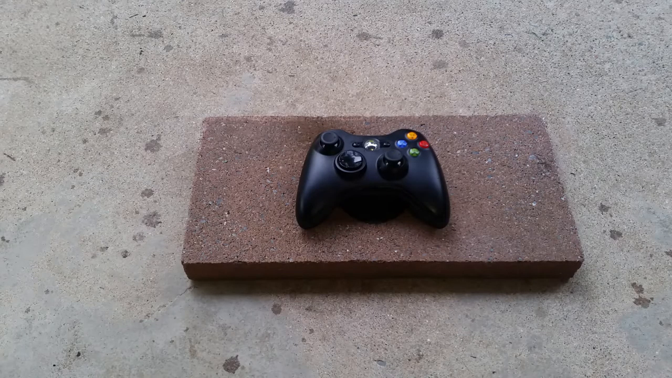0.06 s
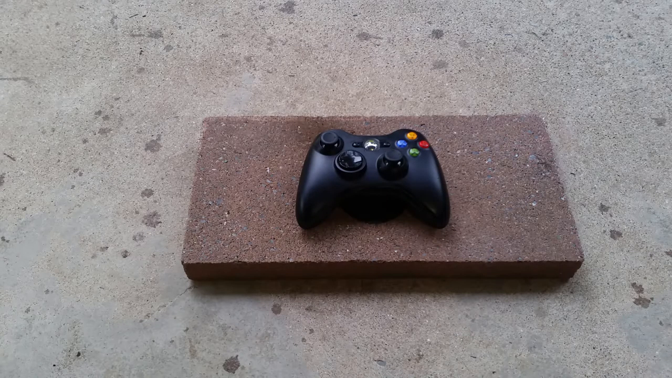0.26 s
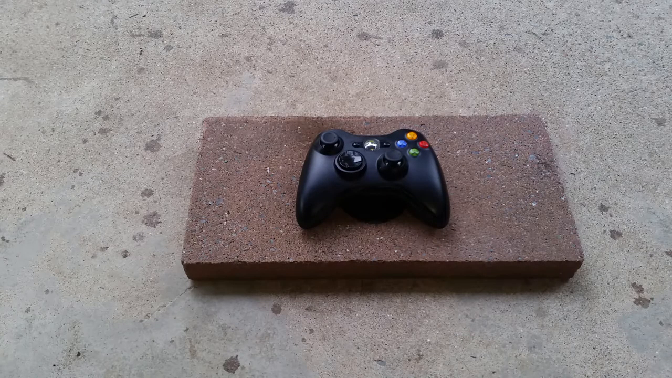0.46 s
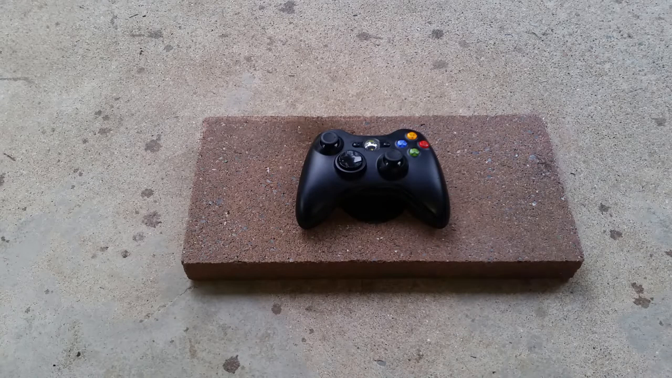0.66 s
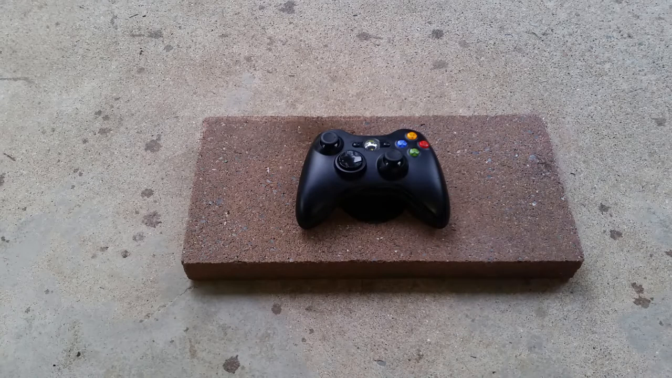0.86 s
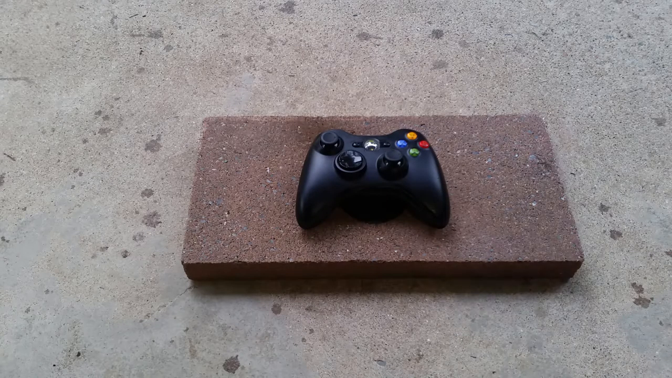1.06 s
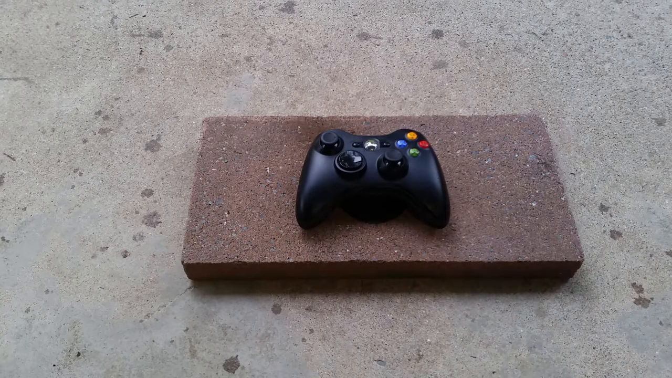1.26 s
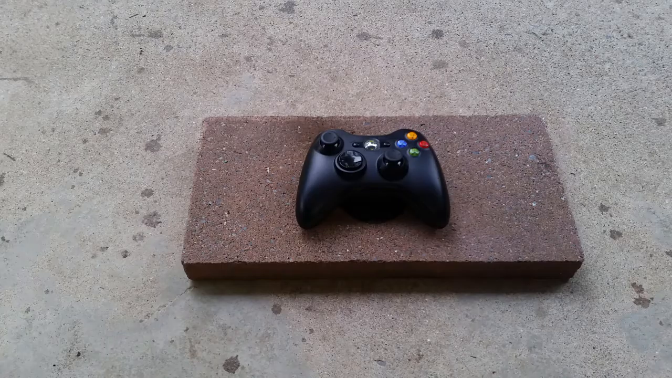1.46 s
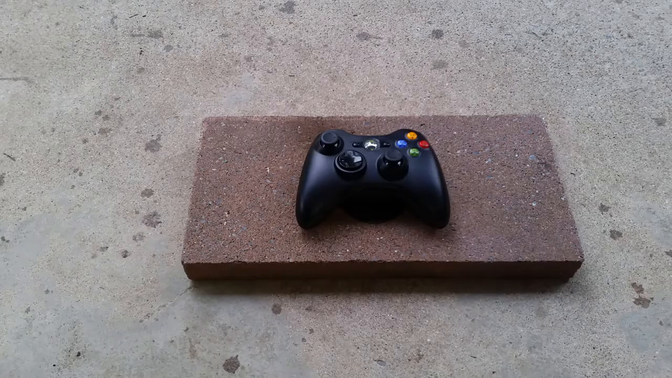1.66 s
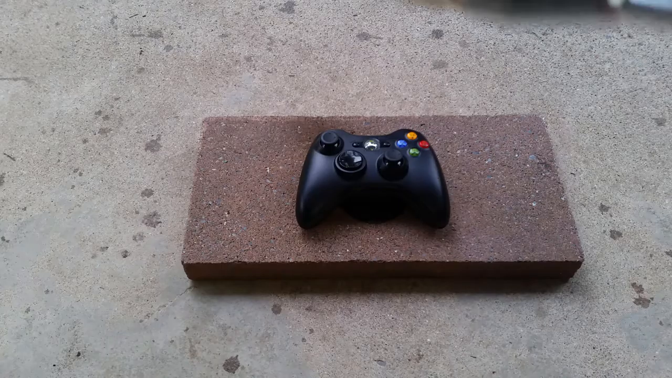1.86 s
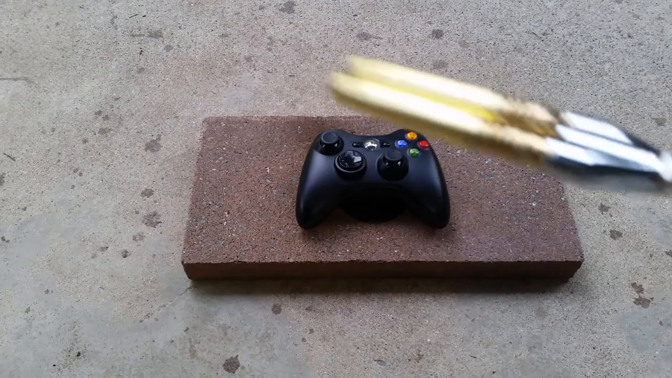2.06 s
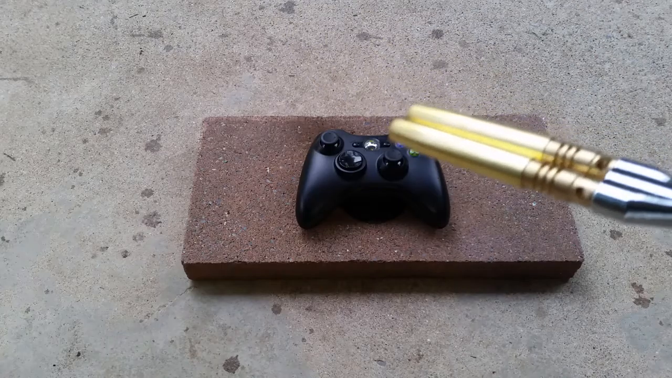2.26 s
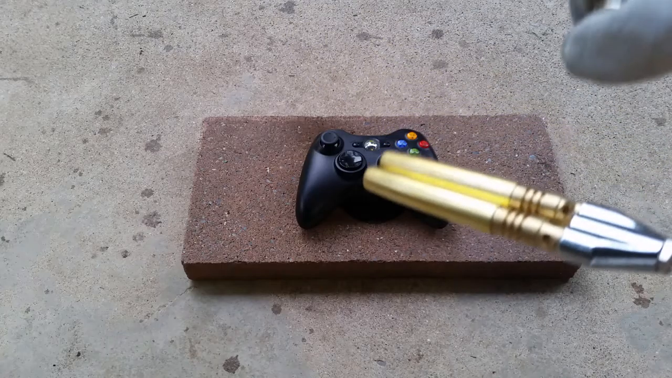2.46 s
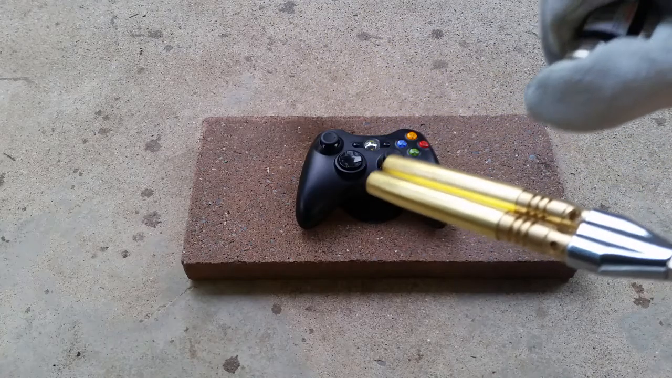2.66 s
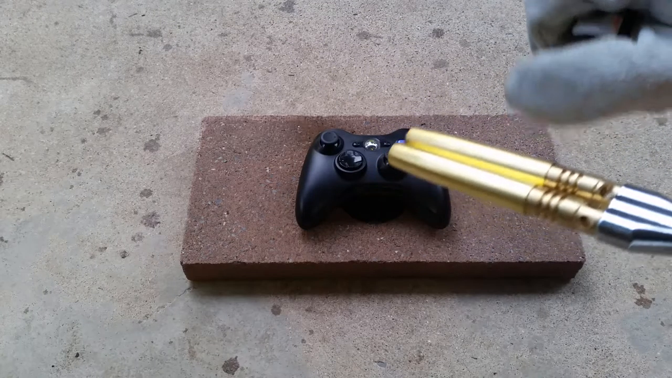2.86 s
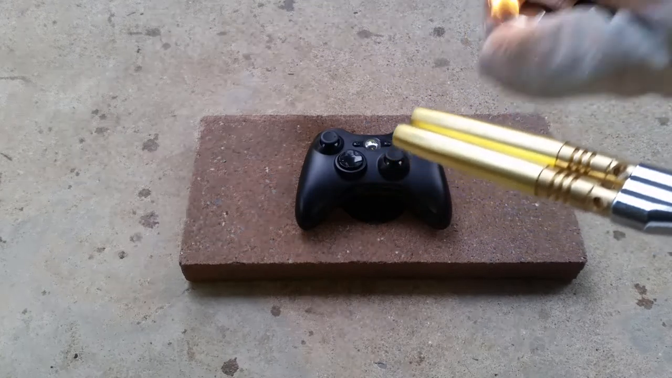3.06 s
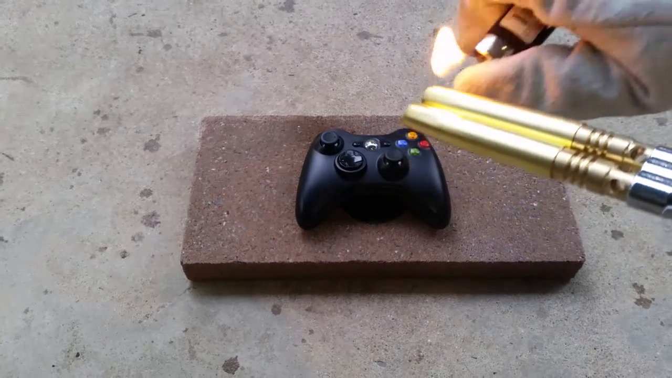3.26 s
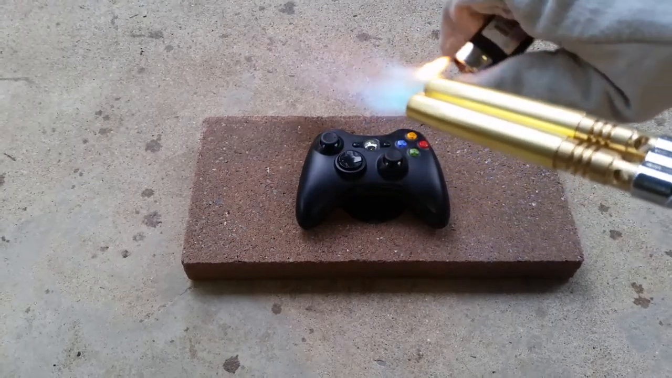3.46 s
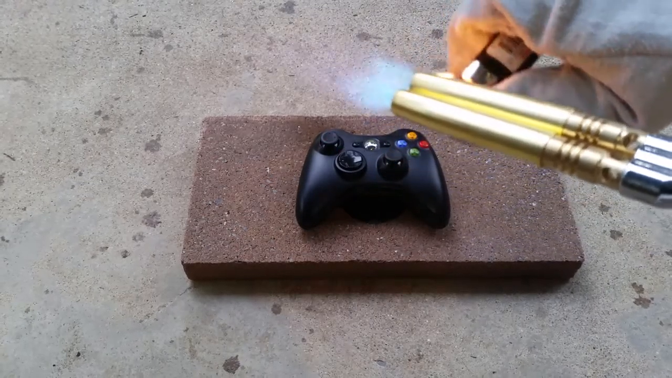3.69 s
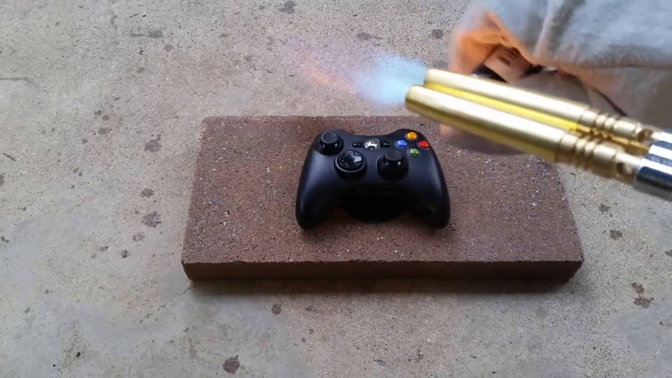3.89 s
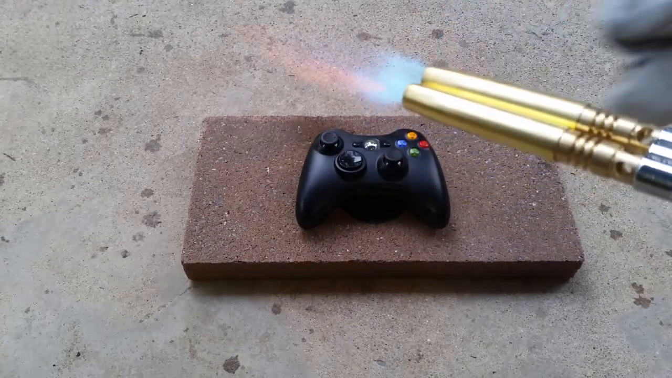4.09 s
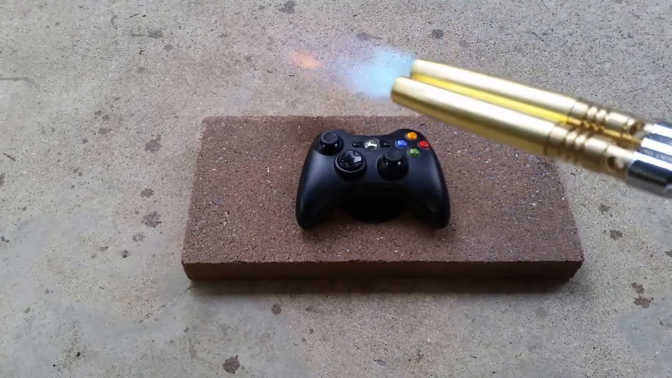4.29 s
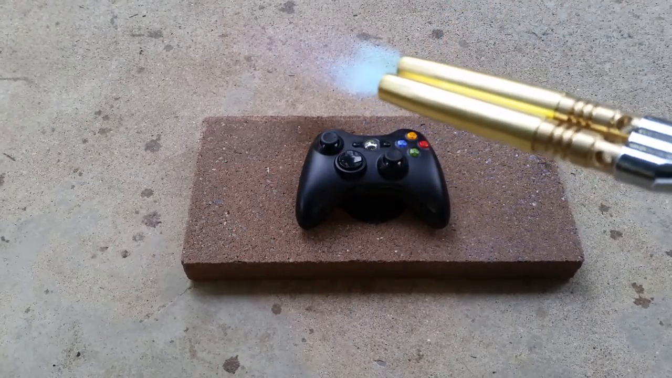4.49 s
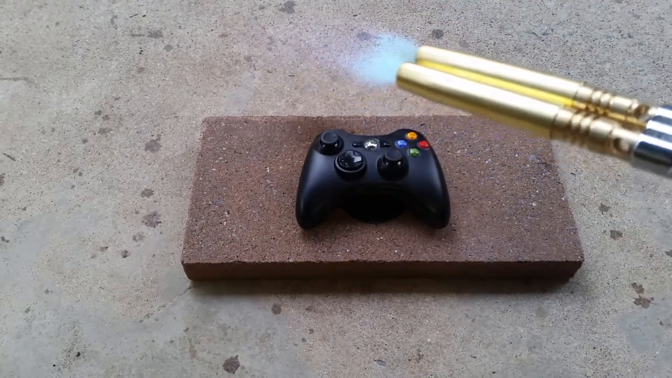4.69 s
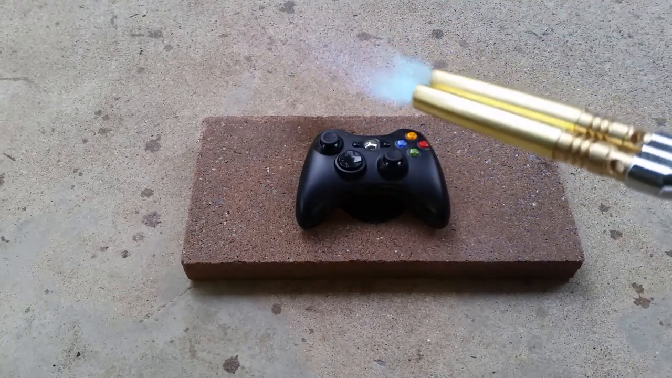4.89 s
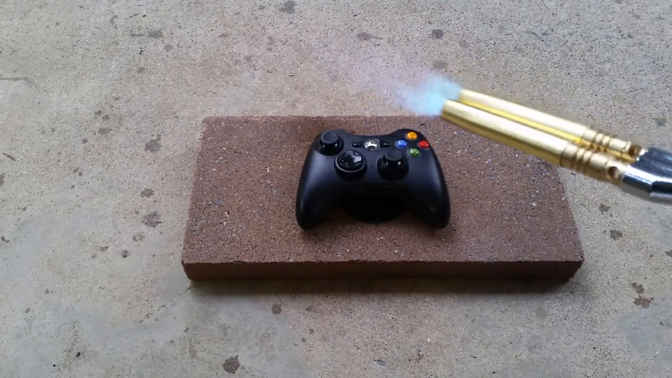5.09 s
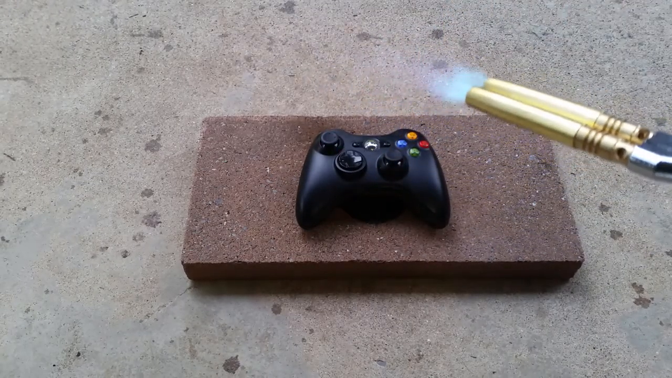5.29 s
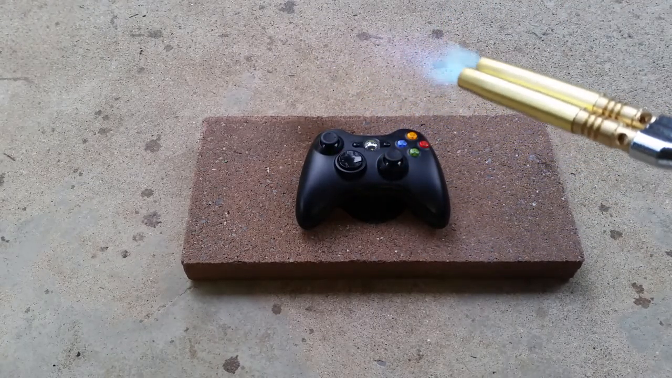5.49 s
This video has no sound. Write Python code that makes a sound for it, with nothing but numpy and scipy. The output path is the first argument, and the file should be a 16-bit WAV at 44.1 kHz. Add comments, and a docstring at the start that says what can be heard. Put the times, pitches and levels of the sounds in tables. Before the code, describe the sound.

Thin airy gas hiss outdoors, two quick flint scratches, a muffled whump, then a much louder continuous blowtorch flame roar.

```python
"""On a concrete patio with a faint outdoor rumble, a twin-barrel gas torch hisses and whistles unlit.
It swings in close to the listener. A lighter scrapes, and the gas catches with a soft thump and then roars.
Each source is random noise given its own colour, loudness and balance between the ears.
Delayed copies act as echoes: the slab mirrors the roar, and its hollow colour bends upward late on."""
import sys
import numpy as np
from scipy import signal
from scipy.fft import rfft, irfft
from scipy.io import wavfile
from scipy.ndimage import uniform_filter1d, map_coordinates

SR = 44100
rng = np.random.default_rng(int(sys.argv[2]) if len(sys.argv) > 2 else 0)


def generate_wav(sig):
    """Save sig (samples, or channels by samples) to the path in sys.argv[1] as 16-bit PCM at SR."""
    pcm = np.round(np.clip(np.atleast_2d(sig).T, -1, 1) * 32767).astype(np.int16)
    wavfile.write(sys.argv[1], SR, pcm)


N = 244314

IGNITE_S, CATCH_S = 3.373, .013  # the gas catches, and the flame is full this much later

# In every table, balance_db is left minus right, and same is how alike the ears are (1 = identical).
# Colour levels are relative: each noise is scaled to its own loudness afterwards.

# Outdoor rumble colour: pitch_hz, level_db (per Hz); then its loudness in dB
OUTDOORS_COLOUR, OUTDOORS_DB = [(20, -28), (50, -23), (100, 6), (160, -1), (260, -6.5), (420, -9),
                                (700, -9.5), (2000, -19.5), (8000, -41)], -65.5
# Likeness of the ears for everything but roar and thump: pitch_hz, same
AIR_SAME = [(60, 1), (300, 0.6), (1400, 0.85), (3000, 0.2), (6000, 0.048), (14000, .05)]
# Lighter wheel scraping the flint: start_s, level_db, rise_s, decay_s
STRIKES = [(2.984, -58.5, .008, .02), (3.010, -48.7, .007, .014)]
# Colour of the scrapes: pitch_hz, level_db (per Hz)
STRIKE_COLOUR = [(20, -10), (60, 0), (200, 8), (600, 3), (1200, 7), (1800, 2), (4500, 2), (7000, -8),
                 (14000, -13)]
# Gathered gas catching, one event: start_s, level_db, rise_s, decay_s
THUMP = (IGNITE_S, -42, .007, .038)
# Colour of the thump: pitch_hz, level_db (per Hz)
THUMP_COLOUR = [(20, -32), (45, -18), (90, 2.5), (160, 4), (400, -3), (1500, -48)]
# Hollow whistle of the unlit barrels: time_s, pitch_hz, level_db (before a lift), balance_db
WHISTLE = [(0, 1317, -56, -7), (.3, 1310, -56, -3), (.46, 1315, -52.5, 0), (1.2, 1324, -56.5, -0.5),
           (1.88, 1354, -59, 2), (2.08, 1250, -60.5, 0), (2.4, 1274, -57.5, -2), (2.7, 1284, -57, -1),
           (3.1, 1243, -56, -3.5), (3.35, 1243, -58.5, -4)]
# Colour of the whistle: multiple of its pitch, level_db
WHISTLE_COLOUR = [(.4, -45), (.7, -36), (.8, -18.5), (.91, -11), (.96, -3), (1, 4), (1.04, -3.5),
                  (1.11, -15), (1.35, -20), (2, -42)]
# Hiss as the hand-held nozzle turns: time_s, level_db (before a lift), balance_db (before scaling)
JET = [(0, -52, -9), (.6, -52.5, -10), (1.3, -53, -6), (1.95, -53.5, -5.5), (2.65, -55.5, -8),
       (3.35, -54.5, -9), (4.2, -55.6, -4.5), (5.54, -56, -9)]
# Colour of the hiss: pitch_hz, level_db (per Hz)
HISS_COLOUR = [(300, -6), (700, -1.5), (1000, 9), (1700, 4.5), (2500, -2), (3000, -3), (4300, -1.5),
               (5800, 1), (7400, 0), (8500, -1), (10600, 1), (12500, 5.5), (14400, 0.5)]
# Upper barrel resonances: unlit_hz, lit_hz, width_hz (before narrowing), unlit_db, lit_db
BARREL = [(3260, 3700, 270, 2, -3), (5160, 5330, 240, 8.5, 7.5), (6530, 6930, 293, 13, 11),
          (8160, 8080, 260, 5, -17), (9900, 9400, 300, 2, 2), (11700, 11600, 360, 12, 8.5),
          (13170, 13500, 570, 8, 4)]
# Swelling and sinking of the hiss around the top resonance: time_s, change_db
SIZZLE = [(0, 4), (.2, -2), (.36, -4), (.48, 1.5), (.75, 1.5), (1.05, 1), (1.25, 1), (1.45, 1), (1.85, 5),
          (2.08, -3), (2.3, 1.5), (2.6, -4.5), (2.95, 2), (3.1, 2), (3.3, 3), (3.42, 2)]
# Colour of the roar: pitch_hz, level_db (per Hz)
ROAR_COLOUR = [(25, -49), (55, -61), (110, -9.5), (180, -5), (270, 1), (380, -8), (490, -0.8), (620, -1.1),
               (780, -4.5), (1020, -5), (1450, -7.5), (2100, -15), (3300, -23), (4150, -25.5),
               (4450, -27.5), (9000, -37.5)]
# Likeness of the ears in the roar and thump: pitch_hz, same
ROAR_SAME = [(60, 1), (600, 0.97), (1400, 0.98), (3000, 0.69), (7000, 0.32)]
# Narrow peaks and dips in the roar: pitch_hz, width_hz, change_db
PEAKS_AND_DIPS = [(2400, 68, -2), (2990, 84, -1.5), (3550, 130, 1), (3780, 67, 4)]
# Brighter rush just after ignition: pitch_hz, change_db; then its decay in seconds
RUSH, RUSH_S = [(1400, 0), (2100, 3), (4100, 2.5), (4600, -1.5)], .3
# Hollow band that bends upward as the torch is drawn back: time_s, pitch_hz, height_db
HOLLOW = [(3.4, 1260, .5), (4.95, 1270, .8), (5.13, 1375, 3), (5.3, 1475, 4.2), (5.54, 1510, 4.2)]
# Echoes from nearby surfaces: left_lag_ms, right_lag_ms, gain, shift_ms per ms of change in the slab's lag
ECHOES = [(.47, 0.29, 0.18, 0.043), (1.21, 1.036, 0.18, 0.15), (1.3, 0.9, 0.14, 0.85),
          (2.25, 2.37, 0.089, 0.86), (2.34, 1.84, 0.13, 1.37), (2.458, 2.13, .21, 0.66),
          (3.69, 3.58, 0.083, 0), (5.12, 5, 0.04, 0), (4.42, 6.6, 0.044, 0.11)]
# Echo off the slab, which follows the torch's position: time_s, lag_ms
SLAB = [(0, 2.4), (1.75, 2.2), (2.05, 1.85), (2.6, 1.48), (3.4, 1.59), (3.65, 1.66), (4.45, 1.71),
        (4.85, 1.68), (5.08, 1.52), (5.22, 1.32), (5.54, 1.31)]
# Torch swinging in from the right: time_s, left_ear_lag_ms
BEARING = [(0, 0.21), (.75, 0.12), (1.3, -0.014), (2.7, 0.0025), (3.7, -0.05)]

TIME = np.arange(N) / SR
FRAME_S = np.arange(N // 256 + 5)[:, None] * 256 / SR  # times of the short slices that carry a colour
BIN_HZ = np.fft.rfftfreq(1024, 1 / SR)

EDGE_HZ = 14600
STEADY = .15  # power by which the whistle's own flutter is divided out
SIZZLE_HZ, SIZZLE_WIDTH_HZ = 11500, 600
LIT_HISS_DB = -4  # once lit, the hiss drops
# Unlit resonances near one pitch grow as the hiss leans right: dB per dB of balance
BEAM, BEAM_CENTRE_DB, BEAM_HZ, BEAM_WIDTH_HZ = 1.8, -8, 4930, 1300
FLAME_DB, FLARE_DB, FLARE_S = -40.5, 1, 0.64  # the roar starts a little louder and settles
HOLLOW_WIDTH_HZ, HOLLOW_BELOW_HZ, HOLLOW_ABOVE_HZ = 105, 210, 390  # width, distance to each valley
SLAB_GAIN, SLAB_REST_MS, SLAB_FALLOFF = 0.31, 1.644, 0.54  # echo at its usual lag; shorter is louder
# The roar brightens as the slab's echo comes sooner: dB per octave per ms of lag
BRIGHTEN, BRIGHTEN_BAND_HZ = 4.5, (580, 1900)


def amp(db):
    """Turns decibels into gain."""
    return 10 ** (np.asarray(db) / 20)


def unit(x):
    """Scales to an average strength (rms) of 1."""
    return x / np.sqrt(np.mean(x ** 2) + 1e-20)


def read(points, hz=BIN_HZ):
    """Joins colour points with straight lines on a log-frequency axis."""
    point_hz, value = np.transpose(points)
    return np.interp(np.log(np.maximum(hz, 1e-3)), np.log(point_hz), value)


def follow(rows, t):
    """Reads every column after the first of a time table, at the times t."""
    s, *columns = np.transpose(rows)
    return [np.interp(t, s, column) for column in columns]


def pan(db):
    """Left and right gains for a level difference."""
    return amp(np.array([db, -db]).reshape(2, -1) / 2)


def bell(hz, width_hz):
    """A smooth bump of height 1 over frequency, falling to 1/e at width_hz from its centre."""
    return np.exp(-((BIN_HZ - hz) / width_hz) ** 2)


def wander(rate_hz):
    """Slow random curve of rms 1, with changes faster than rate_hz strongly softened."""
    hz = np.fft.rfftfreq(N, 1 / SR)
    return unit(irfft(rfft(rng.standard_normal(N)) / (1 + (hz / rate_hz) ** 2), N))


def patches(seconds, width_hz):
    """Random field of rms 1 over time and frequency, smoothed into patches of the given size."""
    field = rng.standard_normal((len(FRAME_S), len(BIN_HZ)))
    along = np.fft.fftfreq(len(FRAME_S), FRAME_S[1, 0])[:, None] * seconds
    across = np.fft.fftfreq(len(BIN_HZ), BIN_HZ[1]) * width_hz
    smoothing = np.exp(-2 * (along ** 2 + across ** 2))
    return unit(np.fft.ifft2(np.fft.fft2(field) * smoothing).real)


def noise(shape, likeness):
    """Stereo turbulence of rms 1: random slices given a fixed or moving colour, then overlapped."""
    a, b, c, d = rng.standard_normal((4, len(FRAME_S), len(BIN_HZ)))
    same = np.clip(read(likeness), -1, 1)
    left = a + 1j * b
    right = same * left + np.sqrt(1 - same ** 2) * (c + 1j * d)
    slices = np.array([left, right])
    slices *= shape / np.linalg.norm(shape, axis=-1, keepdims=True)
    sound = signal.istft(slices.swapaxes(1, 2), nperseg=1024, noverlap=768)[1]
    return unit(sound[:, :N])


def puff(event, colour, likeness, side_db):
    """A burst of noise that swells quickly and dies away."""
    s, db, rise, decay = event
    age = np.maximum(TIME - s, 0)
    envelope = np.minimum(age / rise, 1) * np.exp(-np.maximum(age - rise, 0) / decay)
    return noise(amp(read(colour)), likeness) * envelope * amp(db) * pan(side_db)


def lit(t):
    """0 before ignition, 1 once the flame has caught."""
    return np.clip((t - IGNITE_S) / CATCH_S, 0, 1)


def flare(t, seconds):
    """Rises quickly at ignition, then dies away."""
    return lit(t) * np.exp(-np.maximum(t - IGNITE_S, 0) / seconds)


def late(x, ms):
    """The sound delayed by a fixed or moving lag."""
    return map_coordinates(x, [(TIME - ms / 1000) * SR], order=3)


def aimed(x):
    """The torch's bearing shifts when the left ear hears it."""
    return np.array([late(x[0], follow(BEARING, TIME)[0]), x[1]])


def patio(x, wet_db, t60):
    """Adds a short, thin scatter from walls and roof that fades 60 dB in t60 seconds, per ear."""
    t = np.arange(8192) / SR
    sparse = rng.standard_normal((2, len(t))) * (rng.random((2, len(t))) < .06)
    taps = sparse * (t > .006) * amp(-60 * t / t60)
    taps /= np.linalg.norm(taps, axis=1, keepdims=True)
    scatter = signal.fftconvolve(x, taps, axes=1)[:, :N]
    return (x + amp(wet_db) * scatter) / np.hypot(1, amp(wet_db))


def outdoor_rumble():
    """Steady, mostly low noise fills the open air."""
    return noise(amp(read(OUTDOORS_COLOUR)), AIR_SAME) * amp(OUTDOORS_DB) * pan(-5.5)


def lighter():
    """The wheel scrapes the flint, giving short rough bursts."""
    return sum(puff(stroke, STRIKE_COLOUR, AIR_SAME, side_db=-2.5) for stroke in STRIKES)


def ignition():
    """The gathered gas catches at once, giving a soft low thump."""
    return puff(THUMP, THUMP_COLOUR, ROAR_SAME, side_db=-5.0)


def whistle():
    """The cold gas excites the barrels' main resonance, a fluttering band that stops at ignition."""
    pitch_hz = follow(WHISTLE, FRAME_S)[0]
    _, level_db, side_db = follow(WHISTLE, TIME)
    tone = noise(amp(read(WHISTLE_COLOUR, BIN_HZ / pitch_hz)), AIR_SAME)
    smoothed_power = uniform_filter1d((tone ** 2).mean(0), size=600)
    flutter = np.sqrt(abs(smoothed_power) + 1e-6)
    steadied = unit(tone / flutter ** STEADY)
    return steadied * (1 - lit(TIME)) * amp(level_db + 1.33) * pan(side_db)


def hiss_colour():
    """Gas turbulence rings the barrels; the flame retunes them and changes how strongly they ring."""
    burning = lit(FRAME_S)
    beam_db = BEAM * (BEAM_CENTRE_DB - follow(JET, FRAME_S)[1]) * (1 - burning)
    power = amp(read(HISS_COLOUR)) ** 2
    for cold_hz, lit_hz, width, cold_db, lit_db in BARREL:
        hz = cold_hz + (lit_hz - cold_hz) * burning
        ring_db = cold_db + (lit_db - cold_db) * burning
        ring_db = ring_db + beam_db * np.exp(-((hz - BEAM_HZ) / BEAM_WIDTH_HZ) ** 2)
        resonance = 1 / (1 + ((BIN_HZ - hz) / (0.77 * width)) ** 2) ** 2
        power = power + amp(ring_db) ** 2 * resonance
    sizzle_db = follow(SIZZLE, FRAME_S)[0] * bell(SIZZLE_HZ, SIZZLE_WIDTH_HZ)
    # peaks and valleys drift as the hand-held nozzle sways
    sway_db = 1.5 * patches(seconds=.35, width_hz=350)
    return np.sqrt(power) * amp(sizzle_db) * amp(sway_db)


def jet():
    """Gas rushing from the orifice makes turbulent hiss, partly mirrored by the slab."""
    level_db, side_db = follow(JET, TIME)
    hiss = noise(hiss_colour(), AIR_SAME)
    hiss *= amp(level_db + LIT_HISS_DB * lit(TIME) + 2.5 + 0.62 * wander(rate_hz=14.0))
    low = signal.sosfiltfilt(signal.butter(2, 9000, fs=SR, output="sos"), hiss)
    top = hiss - low
    # the slab's moving echo makes the hiss swish as the torch is lowered
    low = low + 0.15 * np.array([late(ear, follow(SLAB, TIME)[0]) for ear in low])
    # the ears differ most in the top octave
    return low * pan(0.5 * side_db) + top * pan(1.02 * side_db)


def roar_colour_db():
    """Flame colour: bright at first, with narrow peaks and dips and a hollow band that bends upward."""
    octaves = np.log2(np.clip(BIN_HZ, *BRIGHTEN_BAND_HZ))
    tilt_db = BRIGHTEN * (SLAB_REST_MS - follow(SLAB, FRAME_S)[0]) * octaves
    rush_db = read(RUSH) * flare(FRAME_S, RUSH_S)
    narrow_db = sum(db * bell(hz, width) for hz, width, db in PEAKS_AND_DIPS)
    hz, height_db = follow(HOLLOW, FRAME_S)
    valleys = bell(hz - HOLLOW_BELOW_HZ, HOLLOW_WIDTH_HZ) + bell(hz + HOLLOW_ABOVE_HZ, HOLLOW_WIDTH_HZ)
    hollow_db = height_db * (bell(hz, HOLLOW_WIDTH_HZ) - valleys)
    return read(ROAR_COLOUR) + tilt_db + rush_db + narrow_db + hollow_db


def flame():
    """Turbulent burning roars, heard directly, off the slab and off nearby surfaces."""
    envelope = lit(TIME) * amp(FLAME_DB + FLARE_DB * flare(TIME, FLARE_S))
    slab_ms = follow(SLAB, TIME)[0]
    slab_gain = SLAB_GAIN * (SLAB_REST_MS / slab_ms) ** SLAB_FALLOFF
    moved_ms = slab_ms - SLAB_REST_MS
    roar = noise(amp(roar_colour_db()), ROAR_SAME) * amp(0.79 * wander(rate_hz=22))
    ears = []
    for ear, offset_ms in enumerate((.016, -.016)):
        slab = slab_gain * late(roar[ear], slab_ms + offset_ms)
        others = sum(gain * late(roar[ear], lag_ms[ear] + shift * moved_ms)
                     for *lag_ms, gain, shift in ECHOES)
        ears.append(roar[ear] + slab + others)
    return patio(np.array(ears) * envelope * pan(-2.5), wet_db=-11.5, t60=0.098)


def scene():
    """Adds the torch and lighter to a faint outdoor rumble."""
    background = outdoor_rumble()
    strike = lighter() + ignition()
    gas = patio(aimed(jet() + whistle()), wet_db=-9.5, t60=0.073)
    return background + strike + gas + aimed(flame())


def record(dry):
    """Cuts away the treble above EDGE_HZ with a steep filter."""
    low_pass = signal.firwin(1023, EDGE_HZ, window=("kaiser", 9), fs=SR)
    return signal.oaconvolve(dry, low_pass[None], "same")


dry = scene()
out = record(dry)
generate_wav(out)
```